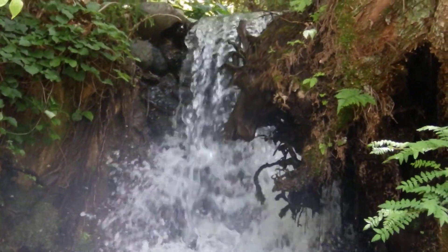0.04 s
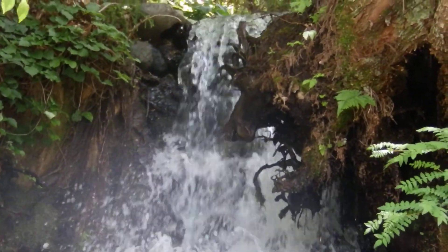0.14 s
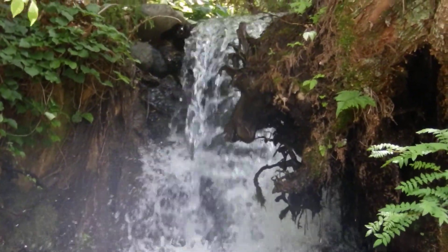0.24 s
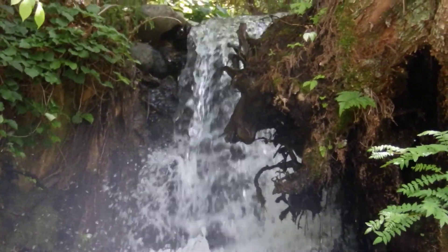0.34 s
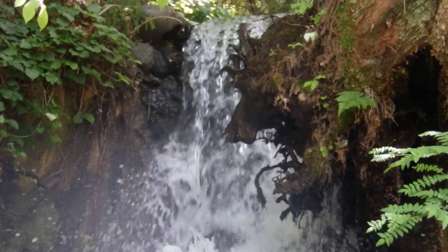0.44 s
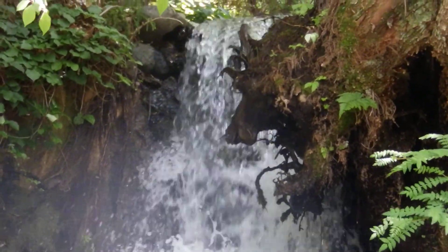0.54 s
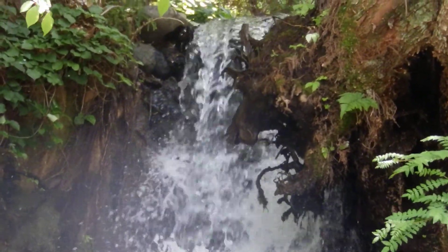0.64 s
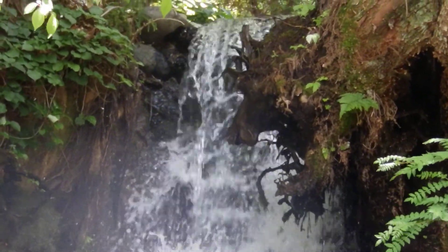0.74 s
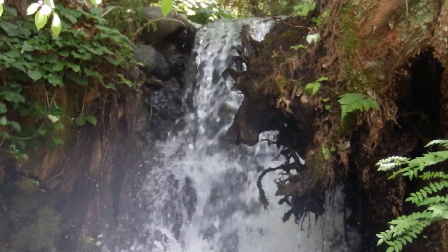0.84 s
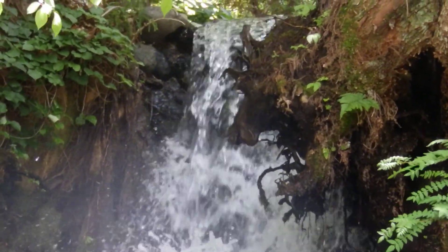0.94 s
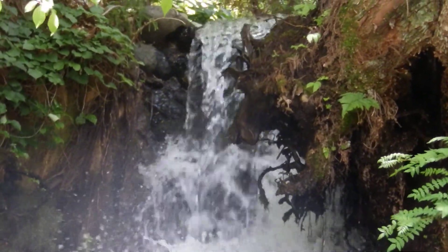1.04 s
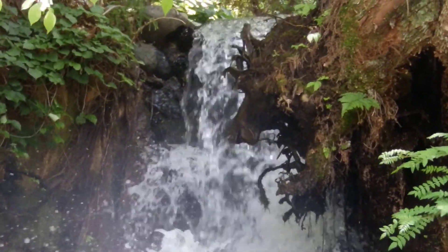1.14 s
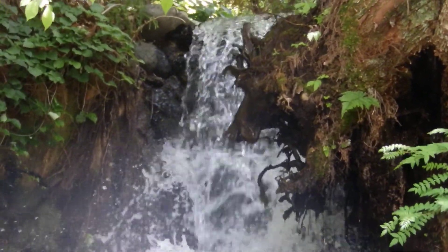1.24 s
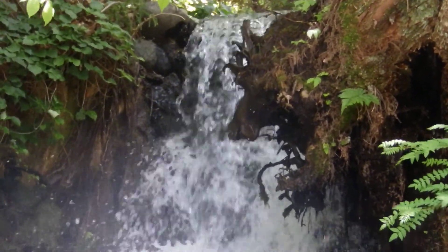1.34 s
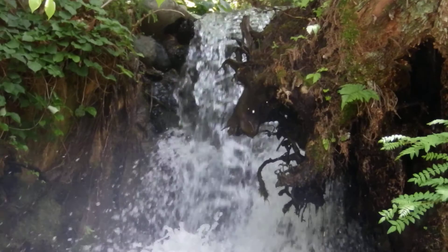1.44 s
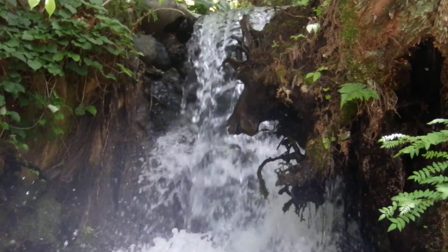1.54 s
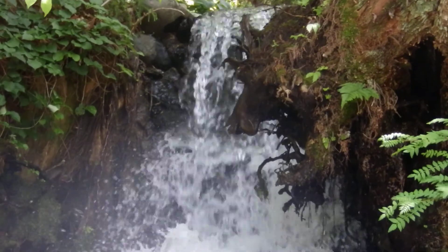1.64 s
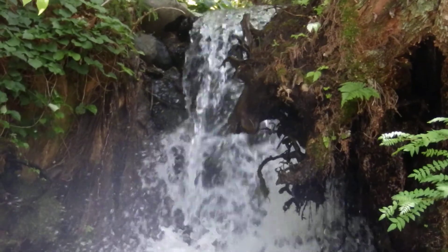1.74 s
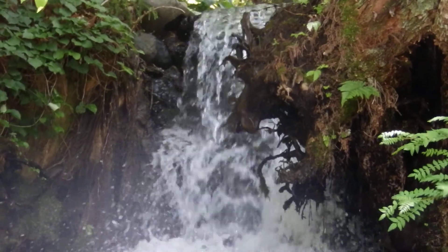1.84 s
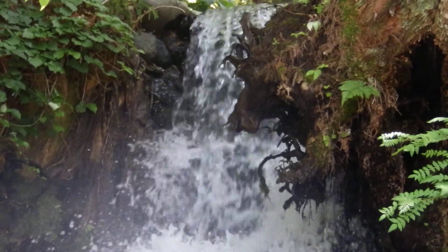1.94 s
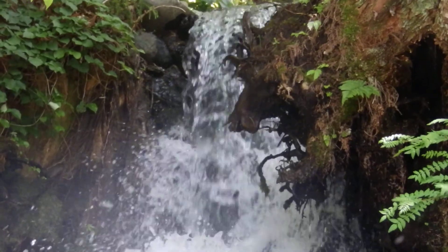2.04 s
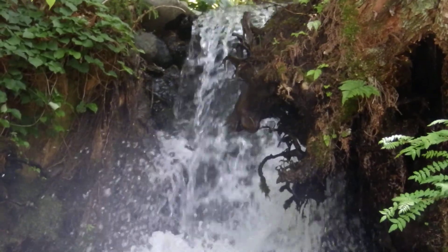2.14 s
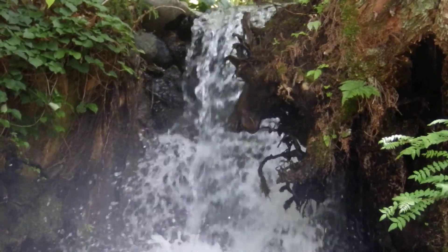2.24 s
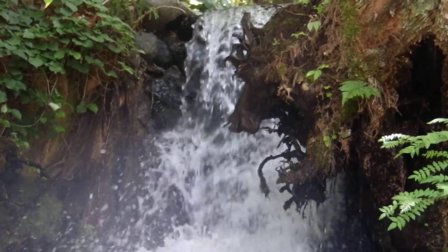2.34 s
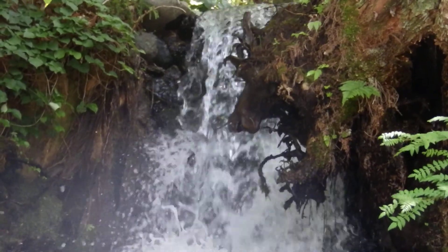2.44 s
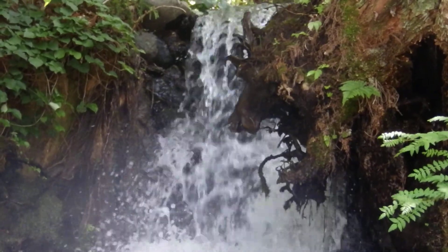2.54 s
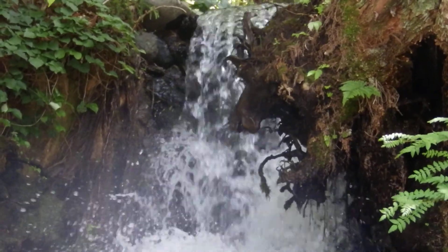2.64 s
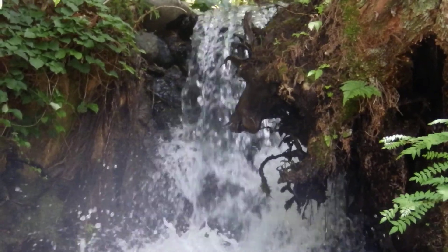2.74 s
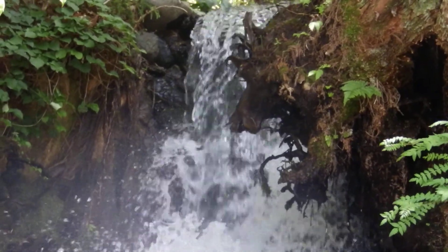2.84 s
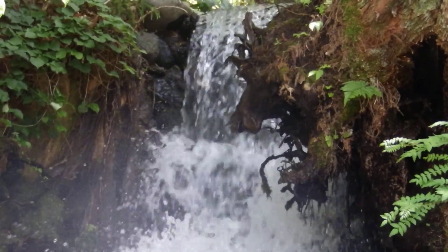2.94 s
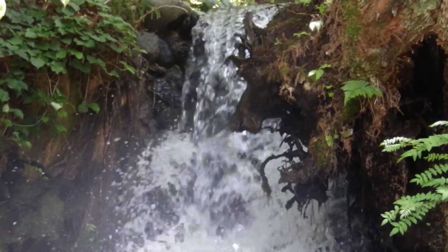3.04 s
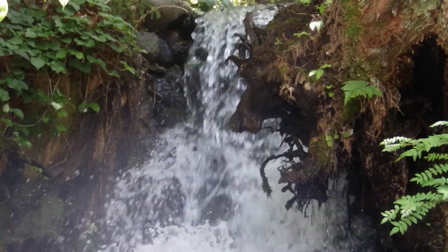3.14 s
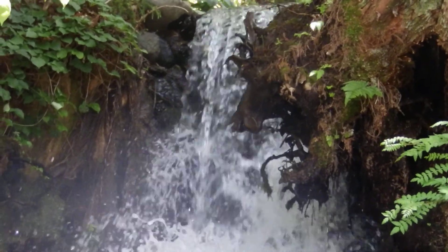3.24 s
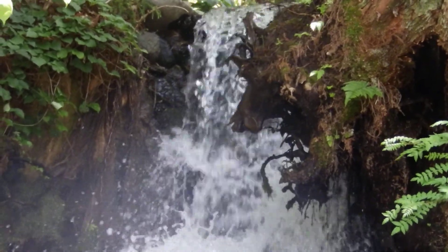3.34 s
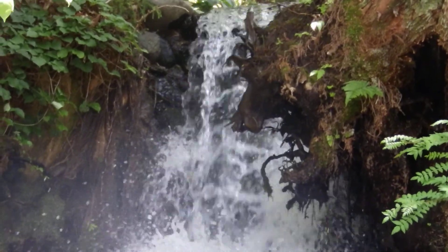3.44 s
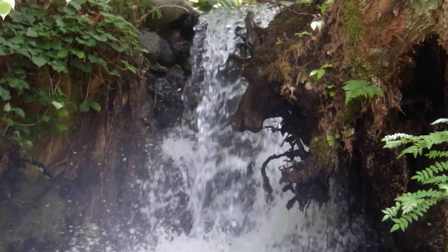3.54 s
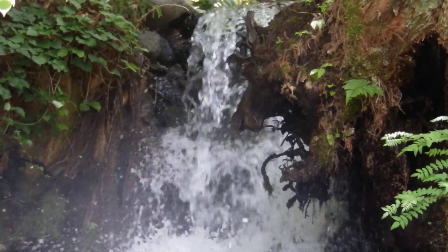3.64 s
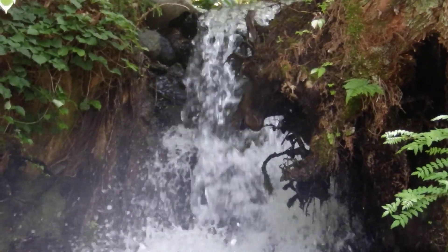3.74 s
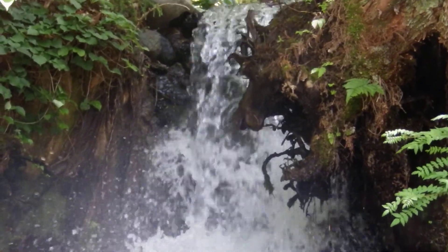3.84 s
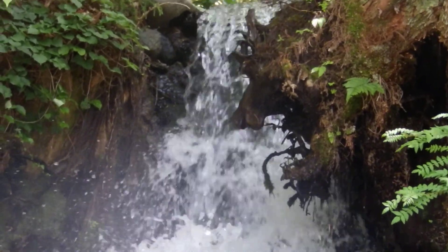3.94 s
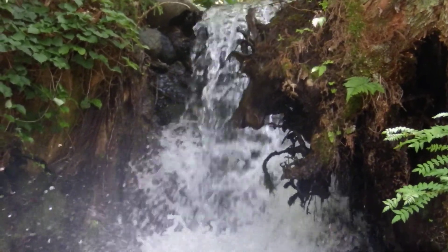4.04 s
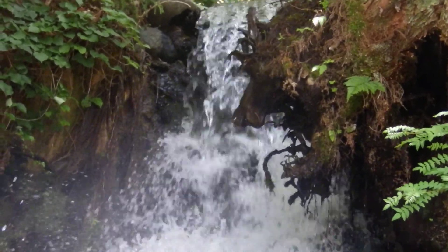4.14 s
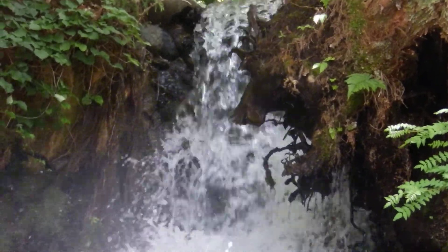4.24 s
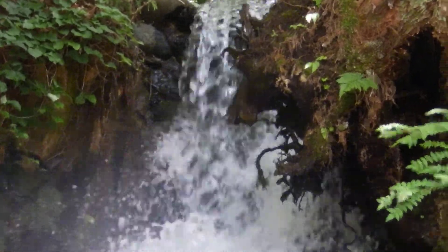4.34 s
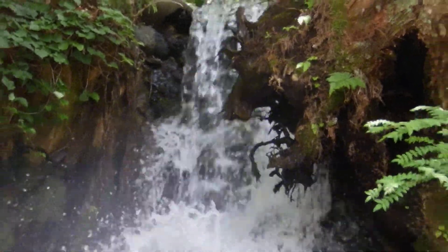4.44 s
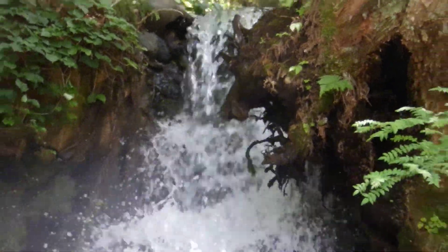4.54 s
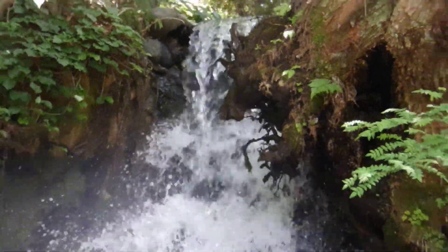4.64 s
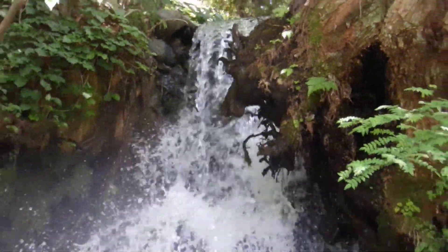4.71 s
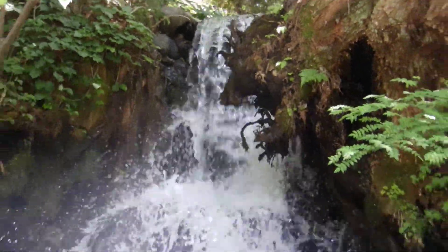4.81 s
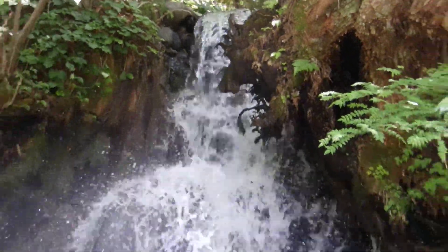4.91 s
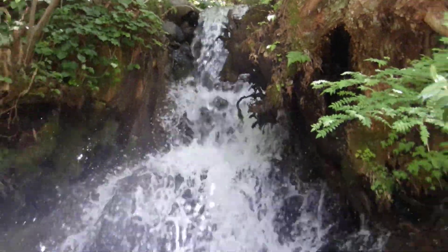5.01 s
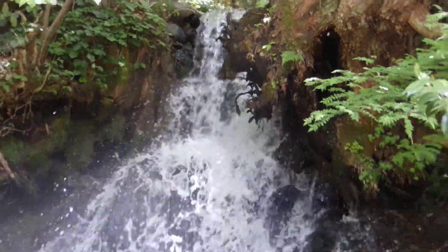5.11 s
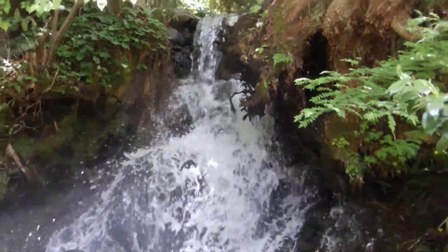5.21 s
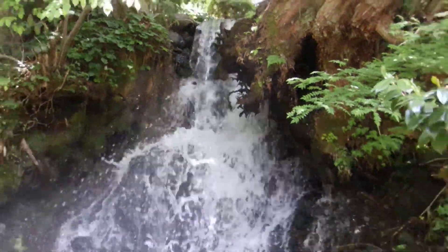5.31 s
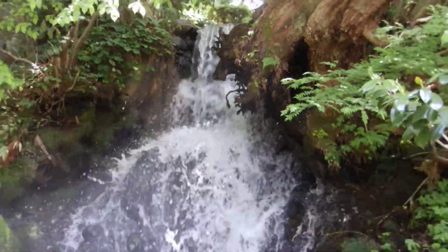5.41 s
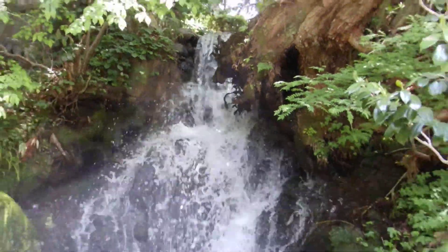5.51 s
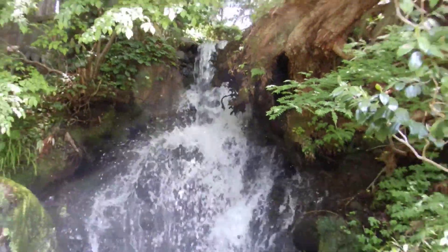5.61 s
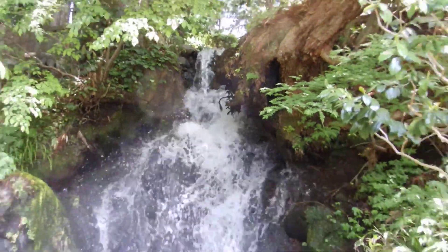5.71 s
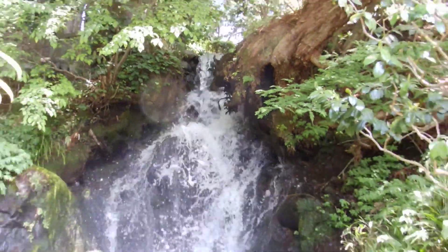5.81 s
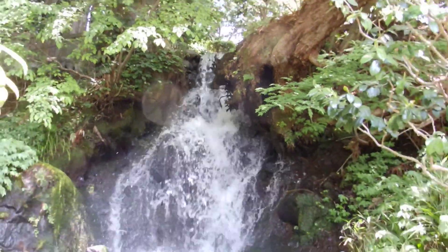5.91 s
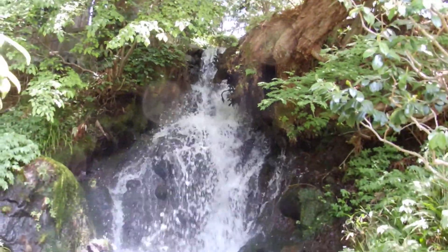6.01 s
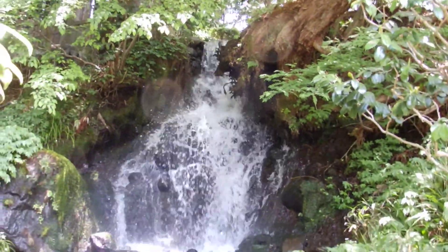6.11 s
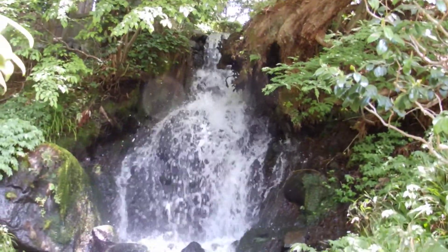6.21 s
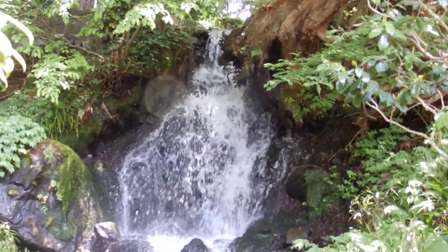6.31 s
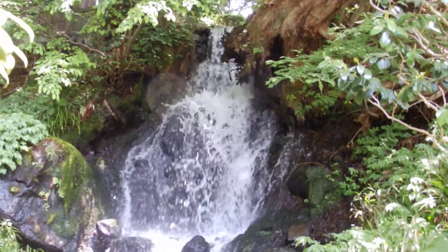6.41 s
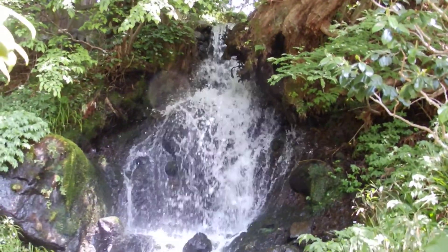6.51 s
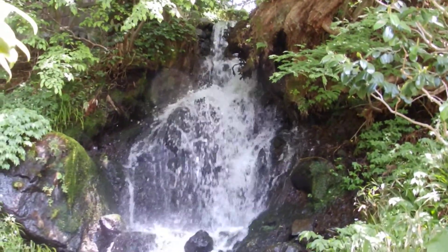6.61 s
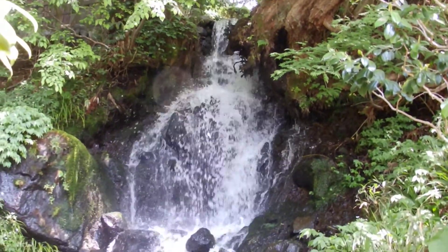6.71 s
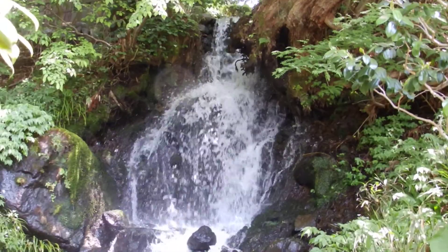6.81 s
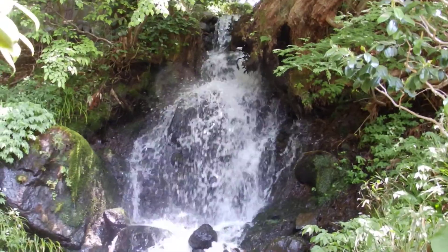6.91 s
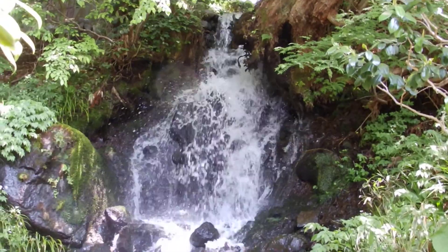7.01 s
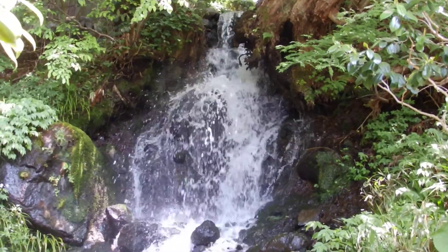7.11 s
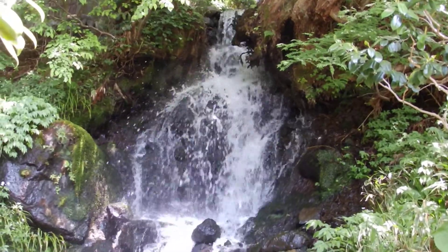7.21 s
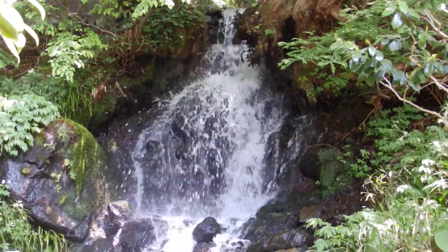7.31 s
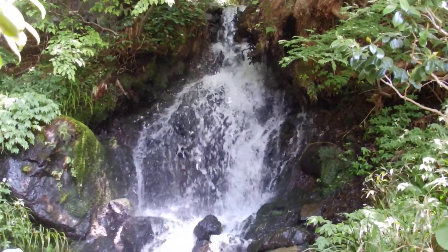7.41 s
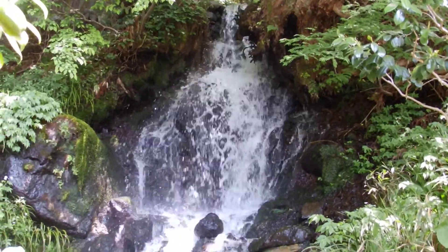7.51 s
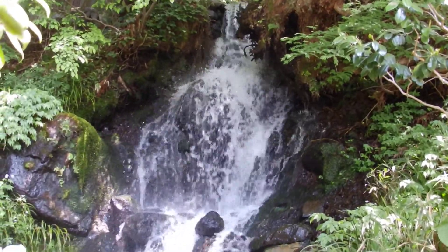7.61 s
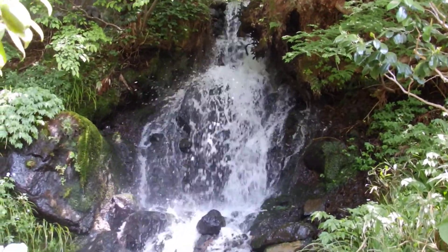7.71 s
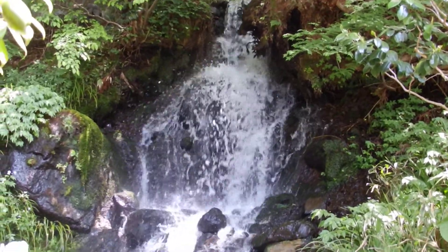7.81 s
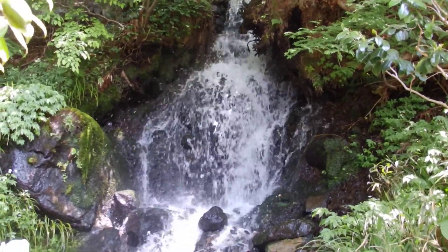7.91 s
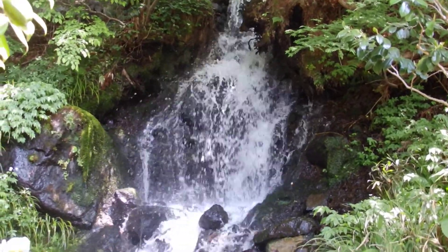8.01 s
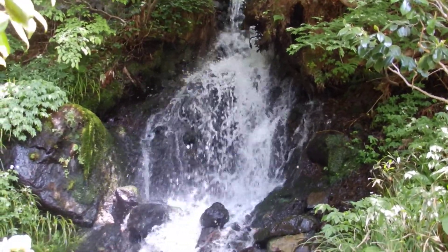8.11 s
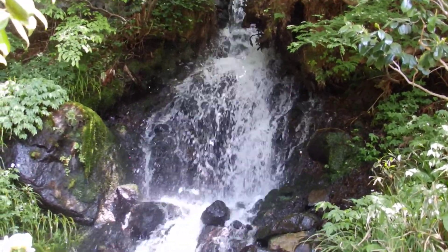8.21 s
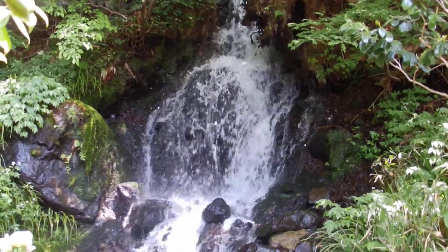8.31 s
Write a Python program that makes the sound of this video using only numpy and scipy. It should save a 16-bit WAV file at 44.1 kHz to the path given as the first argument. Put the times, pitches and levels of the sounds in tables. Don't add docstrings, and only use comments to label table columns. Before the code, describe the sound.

Steady close waterfall wash with dense bubbly fizz, low flutters, small slaps and plops, briefly dulled and lowered midway before coming back.

```python
import sys
import numpy as np
from scipy import signal
from scipy.io import wavfile
from scipy.ndimage import uniform_filter1d

SR = 44100
rng = np.random.default_rng(int(sys.argv[2]) if len(sys.argv) > 2 else 0)


def gain_from_decibels(decibels):
    exponent = np.asarray(decibels, float) / 20
    return 10 ** exponent


def file_out(sig):
    cols = np.atleast_2d(sig).T
    lim = np.clip(cols, -1, 1)
    pcm = np.round(lim * 32767).astype(np.int16)
    wavfile.write(sys.argv[1], SR, pcm)


N = 368676


def evened(x):
    return x / np.sqrt(np.mean(x ** 2) + 1e-20)


def read(points, hz):
    f, value = np.transpose(points)
    return np.interp(np.log(hz + 1), np.log(f + 1), value)


def curve(points, t):
    return np.interp(t, *np.transpose(points))


def add(mix, s, sound):
    part = mix[max(round(s * SR), 0):][:len(sound)]
    part += sound[:len(part)]


# [t/s, level/dB]
FLOW = [(0, -23), (0.6, -23.5), (1.5, -24), (1.95, -23), (2.45, -24), (2.75, -23), (3.3, -24.5),
        (3.7, -22.5), (3.98, -24), (4.5, -24.5), (4.7, -22.5), (5.6, -22), (6.05, -23.5), (7.0, -22.5),
        (7.5, -23.5), (7.7, -23), (7.9, -23.5), (8.36, -22.5)]
# [f/Hz, level/dB per Hz]
WATER_COLOUR = [(30, -34), (75, -22.5), (125, -13), (220, -7), (265, -3), (400, -6), (600, -1.5),
                (800, -1.5), (1650, -2.5), (2050, -7), (2450, -2.5), (2900, -3.5), (3400, -6.5), (4500, -5)]
# [f/Hz, level/dB]
MIC_PORT = [(4500, -1), (5500, -3), (6800, -9.5), (7600, -14), (8400, -15), (10000, -11.5), (12000, -8),
            (13200, -11.5), (14300, -15), (15600, -15)]


def waterfall(fizz_db=-9, plunge_hz=1100):
    spray = wash() + gain_from_decibels(fizz_db) * fizz()
    hz, t, z = signal.stft(spray, SR, nperseg=2048, noverlap=1536)
    colour_db = read(WATER_COLOUR, hz) + read(MIC_PORT, hz)
    low_db = plunge_db(t) / (1 + (hz[:, None] / plunge_hz) ** 2)
    z = z * gain_from_decibels(colour_db[:, None] + low_db)
    water = signal.istft(z, SR, nperseg=2048, noverlap=1536)[1][:N]
    level_db = curve(FLOW, np.arange(N) / SR) + surge_db()
    return evened(water) * gain_from_decibels(level_db)


def wash(patchy_db=0.21, sheets_db=0.38, flicker_db=0.33):
    frames = N // 64 + 5
    real, imag, small, wide = rng.standard_normal((frames, 129, 4)).T
    small = uniform_filter1d(small, size=3, axis=0)
    small = evened(uniform_filter1d(small, size=40, axis=1))
    wide = uniform_filter1d(wide, size=30, axis=0)
    wide = evened(uniform_filter1d(wide, size=30, axis=1))
    flicker = evened(uniform_filter1d(rng.standard_normal(frames), size=8))
    swell_db = patchy_db * small + sheets_db * wide + flicker_db * flicker
    z = (real + 1j * imag) * gain_from_decibels(swell_db)
    return evened(signal.istft(z, nperseg=256, noverlap=192)[1][:N])


def fizz(bubbles_per_s=6000, cycles=9, glide=0.1206, spread_db=2.0):
    starts = rng.random(N) < bubbles_per_s / SR
    strength = gain_from_decibels(spread_db * np.minimum(rng.exponential(1, N), 5)) * starts
    kind = rng.integers(0, 32, N)
    out = np.zeros(N)
    for k, hz in enumerate(np.geomspace(250, 4500, 32)):
        turns = np.arange(2000) * hz / SR
        ring = np.sin(2 * np.pi * turns * (1 + glide * turns / cycles))
        grain = ring * turns * np.exp(-3 * turns / cycles)
        grain /= np.linalg.norm(grain)
        out += np.sqrt(hz) * signal.oaconvolve(strength * (kind == k), grain)[:N]
    return evened(out)


# [t/s, extra level of the low roar/dB]
PLUNGES = [(.14, 1), (.32, 1), (.85, 2), (1.12, 2), (1.22, 2), (1.8, 0.5), (1.9, 1.5), (2.1, 3.5),
           (2.5, -0.5), (2.65, 1.5), (2.83, 1.5), (3.0, 3), (3.32, 1.5), (3.68, 1.5), (4.06, 4.5),
           (4.14, 2), (4.6, 2.5), (4.9, -0.5), (5.6, 0), (6.15, 0), (6.44, 1), (6.52, -0.5), (6.6, 1.5),
           (7.17, 1.5), (7.52, -1.5), (7.65, 1.5), (7.97, 1.5), (8.07, 2.5), (8.3, 0.5)]


def plunge_db(t, lull_db=-0.54, half_width_s=0.033):
    s, db = np.transpose(PLUNGES)
    return lull_db + np.exp(-((t[:, None] - s) / half_width_s) ** 2) @ db


# [t/s, limiter duck level/dB]
SLAPS = [(.15, 1.5), (.304, 0.5), (.372, 1.2), (.535, 1), (.8536, 1.5), (1.0117, 1.5), (1.38, 1), (1.6, 2),
         (2.229, 2.5), (2.737, 1.3), (3.0572, 2.5), (3.1846, 1.5), (3.4252, 2.8), (3.5578, 2.5),
         (3.7455, 3), (4.19, 0.5), (4.745, 2.6), (5.094, 5), (5.341, 2), (5.4398, 2.5), (5.6679, 0.5),
         (6.2756, 1.5), (6.7619, 1.5), (7.0346, 1.2), (7.354, 3), (7.7416, 2), (7.85, 1.2), (8.1058, 2),
         (8.2053, 2)]


def slaps(tone_hz=3500, length_s=0.00018):
    t, out = np.arange(-64, 65) / SR, np.zeros(N)
    click = np.cos(2 * np.pi * tone_hz * t - .6) * np.exp(-(t / length_s) ** 2)
    for s, duck_db in SLAPS:
        add(out, s - 64 / SR, gain_from_decibels(2 * duck_db - 20) * click)
    return out


def surge_db(build_s=0.03, share=0.21):
    out, t = np.zeros(N), np.arange(-SR // 8, 0) / SR
    for s, duck_db in SLAPS:
        add(out, s + t[0], share * duck_db * np.exp(-(t / build_s) ** 2))
    return out


# [t/s, peak level/dB, f/Hz]
PLOPS = [(0.217, -16, 1274), (1.146, -20, 1070), (2.382, -18, 1270), (2.901, -33, 786), (4.118, -20, 1140),
         (6.07, -22, 1000), (6.338, -22, 2410), (6.624, -16, 586), (7.16, -19, 960), (7.239, -20, 1300),
         (7.513, -13.5, 890)]


def plops(cycles=1.95, glide=0.11, trim_db=-3):
    out = np.zeros(N)
    for s, db, hz in PLOPS:
        turns = np.arange(600) * hz / SR
        shape = turns / cycles * np.exp(1 - turns / cycles)
        ring = np.sin(2 * np.pi * turns * (1 + glide * turns / cycles))
        add(out, s, gain_from_decibels(db + trim_db) * shape ** 2 * ring)
    return out


def scene():
    return np.tile(waterfall() + slaps() + plops(), (2, 1))


def limiter_db(hold_s=0.013, recover_db_per_s=24, attack_s=0.002):
    out, t = np.zeros(N), np.arange(SR // 2) / SR
    for s, duck_db in SLAPS:
        left_db = np.clip(duck_db - recover_db_per_s * (t - hold_s), 0, max(duck_db, 0))
        add(out, s, -left_db * (1 - np.exp(-t / attack_s)))
    return out


# [f/Hz, level/dB]
ZOOM_FILTER = [(30, -2.5), (250, -12), (450, -11), (900, -8), (1500, -9), (1950, -16.5), (2250, -26.5),
               (2600, -16.5), (3300, -10.5), (5000, -12.5), (6500, -17), (8000, -23), (12300, -9.5),
               (15600, -6)]
# [t/s, share 0-1]
ZOOM = [
    (4.345, 0.02),
    (4.52, 1),
    (5.85, 0.99),
    (6.03, 0.06),
]


def zoom_filter(x, blend=0.82):
    hz, t, z = signal.stft(x, SR, nperseg=1024, noverlap=768)
    share = np.clip(curve(ZOOM, t), 0, 1) ** 0.87
    filter_gain = gain_from_decibels(blend * read(ZOOM_FILTER, hz))[:, None]
    z = z * (1 - share + share * filter_gain) ** (1 / blend)
    return signal.istft(z, SR, nperseg=1024, noverlap=768)[1][:, :N]


# [t/s, low f/Hz, high f/Hz, level/dB]
NOISE_BURSTS = [(0.18, 13070.0, 14490.0, -48.5), (0.878, 7570.0, 8880, -50.5), (1.32, 7590.0, 10170, -45.1),
                (1.411, 4610, 5710.0, -37.3), (1.551, 5150.0, 6700, -40.1),
                (1.761, 13070.0, 15170.0, -48.2), (1.993, 9700.0, 10940, -44.3),
                (2.826, 9570, 11020.0, -46.1), (2.92, 11030.0, 12420.0, -46.2),
                (3.803, 9630.0, 11030.0, -46.2), (3.803, 13820, 15140.0, -54), (4.175, 6020, 7600.0, -47),
                (4.175, 8980.0, 10340.0, -49.2), (4.29, 8950.0, 10340.0, -48.7),
                (4.29, 11000.0, 12410.0, -46.3), (6.033, 7500, 8950.0, -52), (6.73, 4660.0, 5710.0, -38.0),
                (6.73, 13080.0, 14430.0, -47.3), (7.219, 10980, 12420.0, -42.2),
                (7.68, 8940.0, 10340, -46.8), (7.795, 8250.0, 9650.0, -49.0), (7.911, 7570.0, 10280, -43.6),
                (8.075, 5150.0, 6260, -39.3), (8.075, 11740.0, 13070.0, -43.3),
                (8.075, 13790.0, 15110.0, -50.9)]


def swapped_noise(first_frame=823):
    out, n, line = np.zeros(N), np.arange(2048) + .5, np.arange(1024) + .5
    noise = rng.standard_normal((len(NOISE_BURSTS), 1024))
    for row, (s, lo_hz, hi_hz, db) in zip(noise, NOISE_BURSTS):
        band = (line > lo_hz * 2048 / SR) & (line < hi_hz * 2048 / SR)
        frame = np.cos(np.pi / 1024 * np.outer(n + 512, line[band])) @ row[band]
        start = first_frame + 1024 * (round((s * SR - first_frame) / 1024) - 1)
        add(out, start / SR, gain_from_decibels(db) * evened(frame) * np.sin(np.pi * n / 2048))
    return out * np.array([[1], [-1]])


def band_limit(x):
    return signal.sosfilt(signal.butter(12, 16350, fs=SR, output="sos"), x)


def record(dry, whine_hz=14985, whine_q=32, edge_hz=15745):
    ducked = dry * gain_from_decibels(limiter_db())
    filtered = zoom_filter(ducked)
    notched = signal.lfilter(*signal.iirnotch(whine_hz, whine_q, SR), filtered)
    edge = signal.firwin(2047, edge_hz, window=("kaiser", 9), fs=SR)
    cut = signal.oaconvolve(notched, edge[None], "same", axes=1)
    return band_limit(cut + swapped_noise())


dry = scene()
out = record(dry)
file_out(out)
```